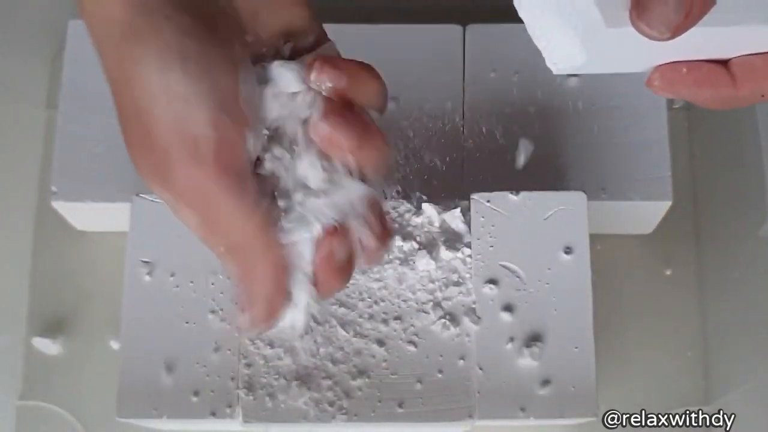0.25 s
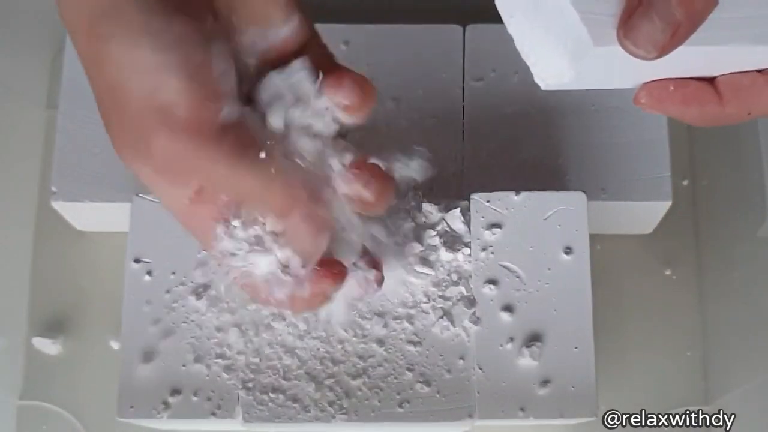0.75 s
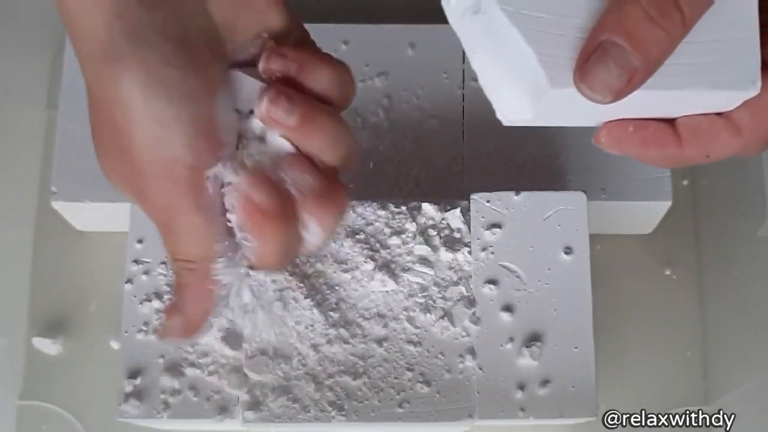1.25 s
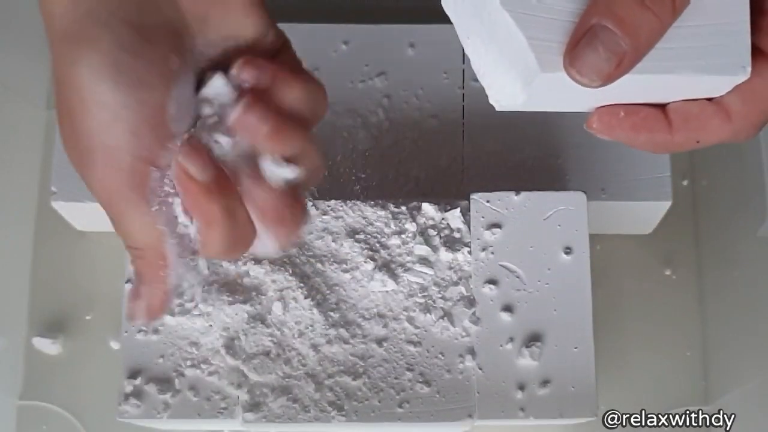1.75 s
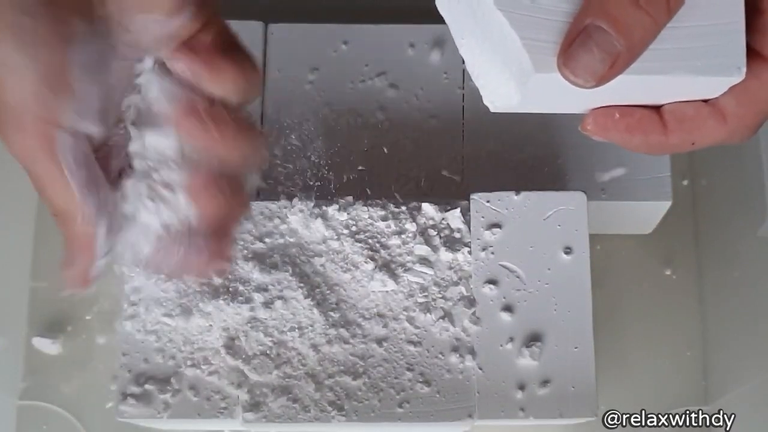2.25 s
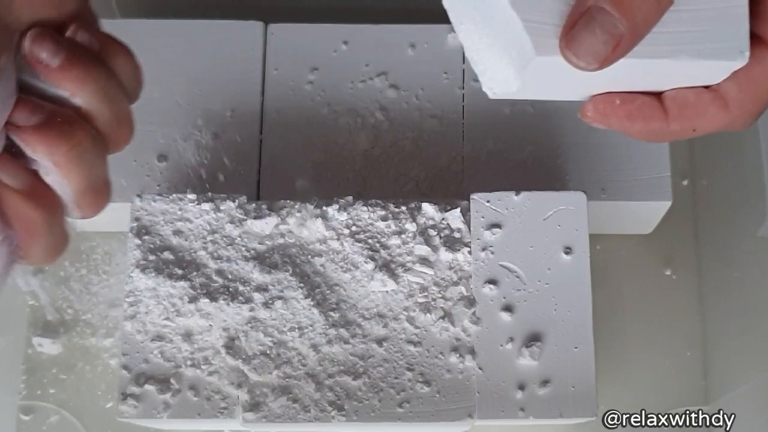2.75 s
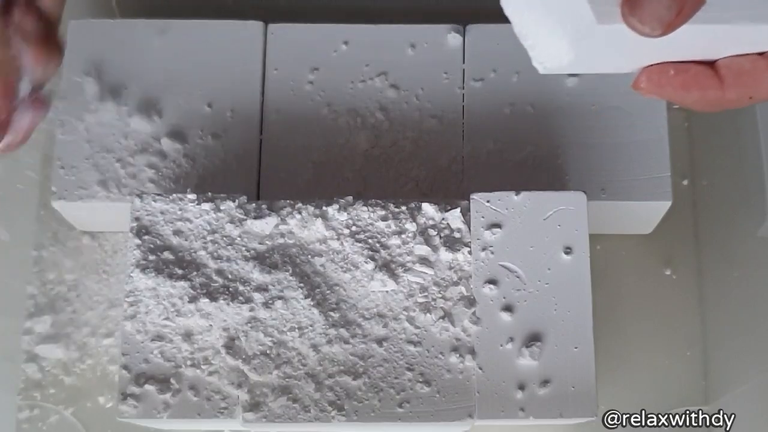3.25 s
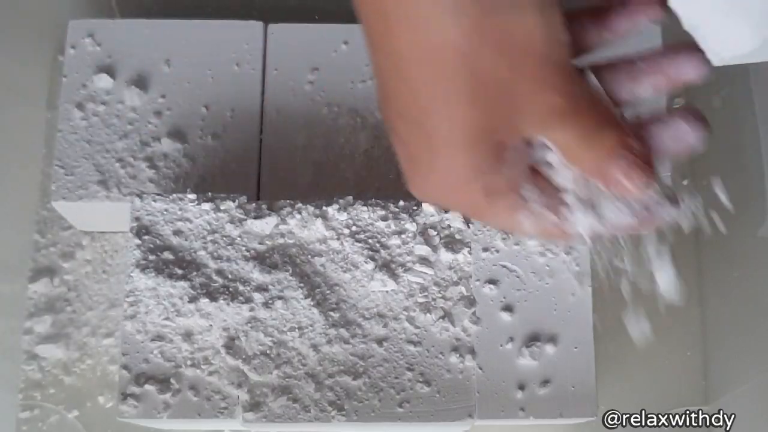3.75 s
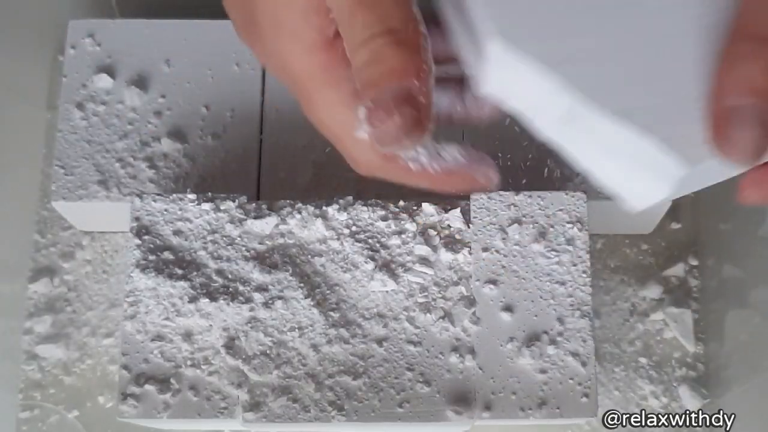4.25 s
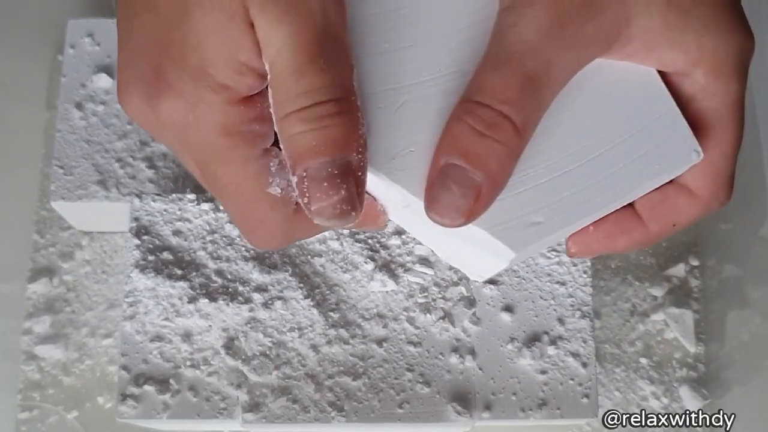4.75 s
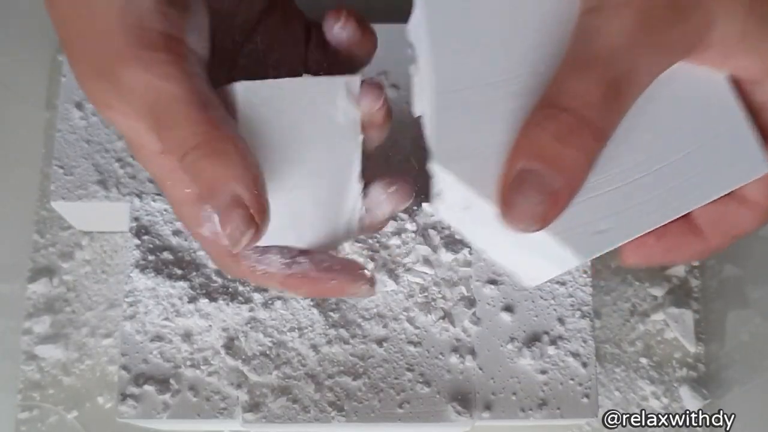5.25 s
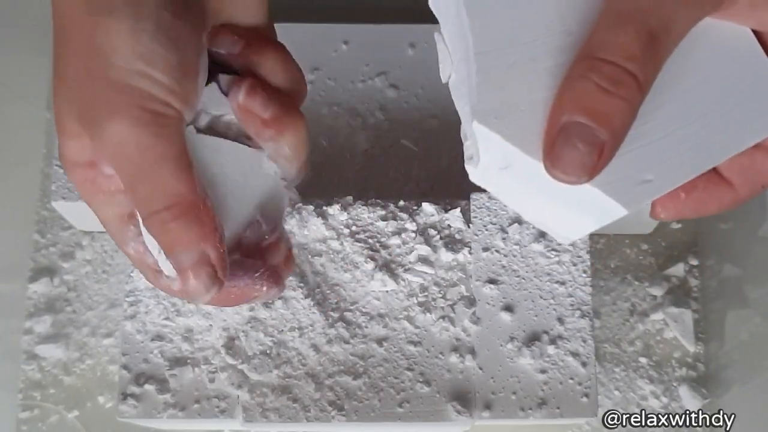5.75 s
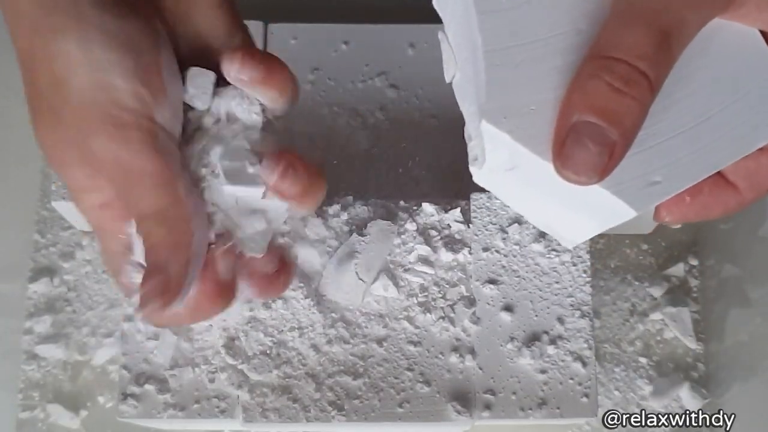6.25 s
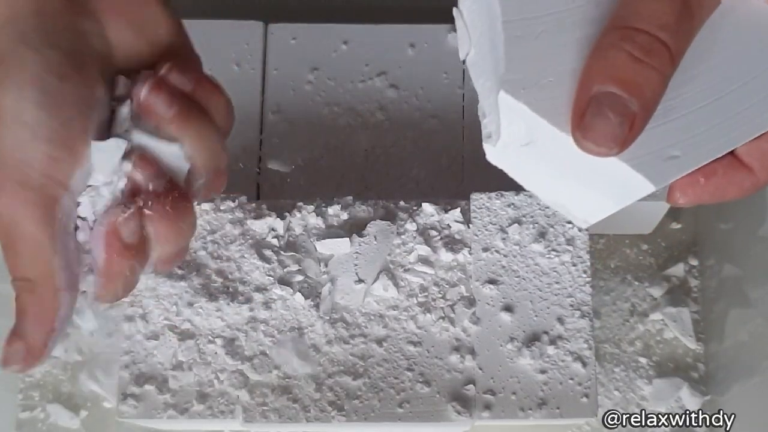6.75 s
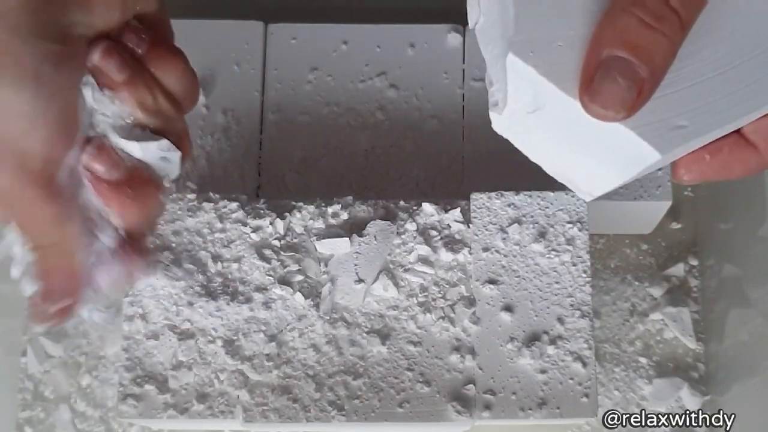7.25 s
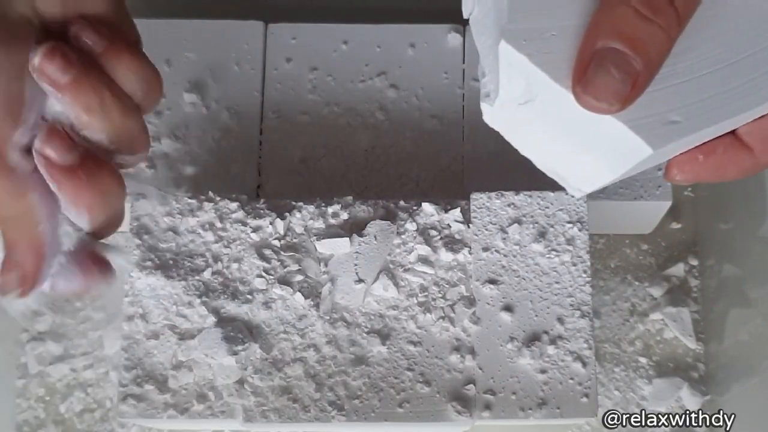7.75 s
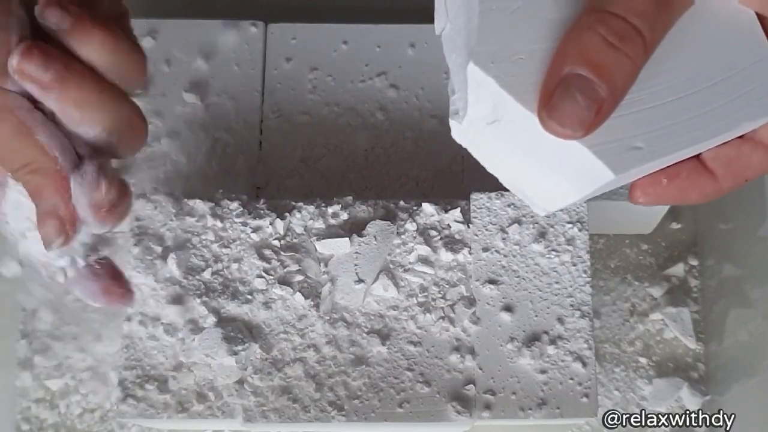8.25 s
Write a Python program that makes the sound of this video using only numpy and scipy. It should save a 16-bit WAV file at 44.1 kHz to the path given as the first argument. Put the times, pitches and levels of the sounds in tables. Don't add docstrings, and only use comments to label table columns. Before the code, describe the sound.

A close microphone in a quiet room with a faint hush and slight hum picks up dry chalk being crushed by hand. From 0 to 2.9 seconds, uneven squeezes give crisp snaps, gritty crackles and swelling powder hiss, with a very sharp crack near 0.15 and a cluster around 2.2 to 2.6. At 3.1 a duller knock lands, then crumbs scatter and patter, thinning by 3.6. Heavy bits tumble in a crunchy cluster from 3.9 to 4.2. A near-silent lull follows until a slab breaks at about 5.0 with a loud, hollow, clinking knock and low thump. Light crackles lead to a loud burst of crushing from 5.7 to 6.2. Dense crunching and grinding continue to about 8.5, with deep knocks near 6.9 and 7.4, brief high clinks, pattering crumbs, hissing powder and a short soft room tail.

```python
import sys
import numpy as np
from scipy import signal
from scipy.fft import rfft, irfft
from scipy.io import wavfile
from scipy.ndimage import uniform_filter1d, map_coordinates

SR = 44100
rng = np.random.default_rng(int(sys.argv[2]) if len(sys.argv) > 2 else 0)


def wav_out(sig):
    wavfile.write(sys.argv[1], SR, np.round(np.clip(np.atleast_2d(sig).T, -1, 1) * 32767).astype(np.int16))


def gain_from_decibels(decibels):
    exponent = np.asarray(decibels, float) / 20
    return 10 ** exponent


N = 374850


def unit(x):
    return x / np.sqrt(np.mean(x ** 2) + 1e-20)


def along(points, hz):
    f, v = np.transpose(points)
    return np.interp(np.log(hz + 1), np.log(f + 1), v)


def coloured(x, spectrum):
    size = 8192
    half = size // 2
    hz = np.fft.rfftfreq(size, 1 / SR)
    cepstrum = irfft(np.log(gain_from_decibels(along(spectrum, hz)) + 1e-6))
    cepstrum[1:half] *= 2
    cepstrum[half + 1:] = 0
    kernel = irfft(np.exp(rfft(cepstrum)))[:half]
    wet = signal.fftconvolve(np.atleast_2d(x), kernel[None], axes=1)
    return wet[..., :x.shape[-1]].reshape(x.shape)


def wobble(rate):
    knots = rng.standard_normal(int(N * rate / SR) + 4)
    return map_coordinates(knots, [np.arange(N) * rate / SR])


def laid(times, rows):
    at = np.round(times * SR).astype(int)[:, None] + np.arange(rows.shape[1])
    return np.bincount(at.ravel(), rows.ravel(), N + SR)[:N]


def levelled(rows, db):
    loud = uniform_filter1d(rows ** 2, 140, axis=1).max(axis=1, keepdims=True)
    return gain_from_decibels(db) * rows / np.sqrt(loud)


def resonance(f, centre, width):
    return 1j * f * width / (centre * centre - f * f + 1j * f * width)


def tearing(count, t, t60, spiky_db):
    draw = rng.standard_normal((count, 2, len(t)))
    uneven = 3.5 * uniform_filter1d(draw[:, 1], 12, axis=1)
    attack = 0.00044 * np.exp(.7 * draw[:, 1, -1:])
    decay = gain_from_decibels(spiky_db * uneven - 60 * t / t60)
    return draw[:, 0] * decay * (1 - np.exp(-t / attack))


def shaped(rows, gain, width, known_hz=()):
    f = np.fft.rfftfreq(rows.shape[1], 1 / SR)
    hz = 4000 * np.exp(0.582 * rng.standard_normal((len(rows), 2, 1)))
    hz[:len(known_hz), :, 0] = np.reshape(known_hz, (-1, 1))
    favour = resonance(f, hz, width * hz).sum(axis=1)
    return irfft(rfft(rows) * (1 + gain * favour), rows.shape[1])


def rings(table, t60, attack):
    s, db, hz = np.transpose(table)[:, :, None]
    t = np.arange(SR // 4) / SR
    envelope = gain_from_decibels(db - 60 * t / t60) * (1 - np.exp(-t / attack))
    return laid(s[:, 0], envelope * np.sin(2 * np.pi * hz * t))


# f/Hz, spectral level/dB per Hz
AIR_SPECTRUM = [(22, -35.5), (45, -4), (70, -11.5), (110, -8), (170, -15), (300, -21.5), (800, -43.5),
                (1050, -32.5), (1300, -48), (1900, -38), (3000, -65.5), (7500, -38), (10500, -61),
                (16000, -71)]


def air():
    hum_hz, hum_db, hush_db = 200.7, -64.5, -57.5
    phase = 2 * np.pi * hum_hz * np.arange(N) / SR + 0.52 * wobble(14)
    hum = gain_from_decibels(hum_db + 3.8 * wobble(6)) * np.sin(phase)
    hush = unit(coloured(rng.standard_normal(N), AIR_SPECTRUM))
    return hum + gain_from_decibels(hush_db + 0.4 * wobble(3.8)) * hush


# t/s, rise/s, fall/s, hiss level/dB
GUSHES = [(.12, 1, 0.15, -42), (.5, 0.45, 0.43, -48.5), (.93, 0.17, 0.71, -47.5), (1.13, 0.29, 0.05, -54),
          (1.3, 0.11, 0.52, -60.5), (1.62, 0.27, 0.087, -56), (1.83, 0.23, 0.05, -51),
          (2.131, 0.22, 0.58, -46), (2.56, 0.1, 0.24, -41), (2.84, 0.18, 0.11, -50.5),
          (2.98, 0.082, 0.071, -53), (3.16, .15, 0.79, -50.5), (3.45, 0.37, 0.086, -58.5),
          (3.793, 0.12, 0.068, -48), (4.11, 0.3, 0.1, -50), (4.24, .08, 0.26, -64),
          (4.45, 0.086, 0.13, -50.5), (4.63, 0.062, 0.084, -53), (4.945, 0.018, .15, -65),
          (5.01, 0.021, 0.5, -56.5), (5.28, 0.038, 0.051, -45.5), (5.4, 0.056, 0.043, -51),
          (5.484, 0.026, 0.023, -39), (5.63, 0.17, 0.68, -50), (5.93, 0.046, 0.49, -46.5),
          (6.31, 0.16, 0.1, -43.5), (6.52, 0.2, 0.98, -44), (7.11, 0.077, 0.18, -40),
          (7.33, 0.14, 0.087, -42), (7.76, .4, 0.56, -44), (8.23, 0.15, 0.83, -55), (8.5, 0.43, .3, -53)]
# t/s, level of crumb patter over powder hiss/dB
COARSENESS = [(0, -4.5), (.68, -2), (1.1, -3.5), (1.6, 1.5), (1.85, -0.5), (2.6, -3), (3.4, -2.5),
              (3.8, -13), (4.11, 13), (4.24, 16.5), (4.36, 3), (4.45, -14), (4.65, -29.5), (5.0, 7),
              (5.3, -15), (5.75, -5), (6.0, -2), (6.2, -2), (8.2, -4.5), (8.5, 10.5)]


def flow():
    still_db, gush_drop_db = -79.5, 20
    t = np.arange(0, N, 100) / SR
    s, rise, fall, peak_db = np.transpose(GUSHES)[:, :, None]
    before = (s - t) / np.maximum(rise, .02)
    after = (t - s) / np.maximum(fall, .02)
    away = np.where(t < s, before, after)
    power = gain_from_decibels(2 * (peak_db - gush_drop_db * away ** 2)).sum(axis=0)
    hiss_db = 10 * np.log10(gain_from_decibels(2 * still_db) + power)
    patter_db = hiss_db + np.interp(t, *np.transpose(COARSENESS))
    return [np.interp(np.arange(N) / SR, t, db) for db in (hiss_db, patter_db)]


def grit(per_s, size_db, t60, hz, spread):
    count, largest_db = 2600, 6.5
    draw = rng.random((count, 2))
    pitch = np.clip(hz * np.exp(spread * rng.standard_normal((count, 1))), 200, 14000)
    times = np.cumsum(np.log(draw[:, 0]) ** 2) / (2 * per_s)
    keep = times < N / SR
    t = np.arange(SR // 50) / SR
    size = gain_from_decibels(np.minimum(-size_db * np.log(draw[:, 1:]), largest_db))
    decay = gain_from_decibels(-60 * t * np.sqrt(pitch) / 1.1)
    ring = np.sin(2 * np.pi * pitch * t) * decay * (1 - np.exp(-t / 0.00029))
    rattle = tearing(count, t, t60, spiky_db=0.0)
    bits = size * (rattle + 0.28 * ring)
    return unit(laid(times[keep], bits[keep]))


# f/Hz, spectral level/dB per Hz
POWDER = [(1180, -74), (2000, -39.5), (4270, -5.5), (4470, -10.5), (5280, -7.5), (9710, -9.5),
          (13000, -23.5), (16500, -35.5)]
# f/Hz, level/dB
CRUMBS = [(150, -23), (400, -1), (700, -4), (1050, 1.5), (1600, -1), (2500, -1), (5000, -7), (10000, -34.5)]


def pour():
    hiss_db, patter_db = flow()
    patter_db = np.minimum(patter_db, -43)
    squeeze = np.clip((patter_db + 64) / 8, .03, 1)
    bits = squeeze * grit(per_s=100, size_db=-2.0, t60=0.012, hz=2920, spread=.8)
    unsteady = 3 * np.array([wobble(110), wobble(60)]) - 5
    stream = gain_from_decibels(squeeze * unsteady) * rng.standard_normal((2, N))
    fine = squeeze * grit(per_s=210, size_db=0.5, t60=0.006, hz=6580, spread=0.5)
    coarse = squeeze * grit(per_s=90, size_db=3.0, t60=0.04, hz=1294, spread=0.27)
    hiss = coloured(stream[0] + 0.69 * bits + 0.88 * fine, POWDER)
    patter = coloured(stream[1] + 0.28 * bits + 1.09 * coarse, CRUMBS)
    return gain_from_decibels(hiss_db + 1.0) * unit(hiss) + gain_from_decibels(patter_db + 3.0) * unit(patter)


# f/Hz, level/dB
CRISP = [(2500, -38.5), (5000, -2.5), (7500, 0.5), (10000, -7), (13000, -20), (16000, -28.5)]
# t/s, crunch level/dB, crisp level/dB
CHIPS = [(0.028, -40, -41.5), (0.034, -39, -35.5), (0.077, -31.5, -33), (0.211, -55, -34),
         (0.274, -56.0, -43.0), (0.454, -60, -36), (0.475, -55, -37), (0.494, -41, -46),
         (0.504, -38, -42), (0.558, -42, -42.0), (0.597, -31.5, -45), (0.628, -35, -38),
         (0.644, -35, -35), (0.78, -39.5, -36.5), (0.8, -43.5, -45), (0.902, -52, -48),
         (0.984, -45, -48.0), (1.277, -46, -33.5), (1.299, -40, -41), (1.333, -52, -50.5),
         (1.461, -33, -48), (1.492, -39, -38), (1.522, -46, -38.5), (1.618, -42, -33.5),
         (1.625, -35, -41), (1.669, -42, -31), (1.944, -46, -50), (2.197, -43, -36),
         (2.205, -26.5, -37), (2.25, -46, -38), (2.276, -45, -39), (2.288, -38, -49),
         (2.294, -37, -34), (2.324, -55, -39), (2.387, -21.5, -38), (2.396, -39, -36),
         (2.406, -44.5, -35), (2.53, -30.5, -34), (2.656, -51, -38), (2.722, -46.5, -49),
         (2.748, -32, -37), (2.77, -42, -34.5), (2.783, -39, -50.0),
         (2.825, -48, -43), (2.838, -39.5, -41), (2.983, -40.5, -35), (3.056, -40, -38),
                (3.14, -41, -32), (3.17, -41, -53.0), (3.228, -39, -33), (3.234, -40, -38),
                (3.275, -34, -48.0), (3.284, -38, -35), (3.361, -56, -30), (3.365, -53, -34),
                (3.393, -38, -35), (3.453, -40, -38.5), (3.497, -36, -49), (3.627, -51, -43),
                (3.709, -54, -40), (3.915, -48, -48.0), (3.923, -52, -37), (3.933, -44.0, -46.0),
                (4.048, -22, -34.0), (4.093, -20.5, -34.0), (4.108, -21, -21.5), (4.181, -34, -38),
                (4.272, -49, -42.5), (4.78, -69, -72), (4.89, -74, -63), (5.176, -62.5, -46.5),
                (5.182, -53, -45), (5.267, -60, -41), (5.685, -50, -54), (5.761, -32, -33),
                (5.774, -31, -47), (5.791, -32, -36), (5.85, -46, -36), (5.934, -37, -21.5),
                (5.958, -24, -24), (6.007, -34, -26), (6.092, -25, -27), (6.198, -32, -34),
                (6.203, -32, -46), (6.252, -37, -52), (6.282, -48, -44),
         (6.289, -37.5, -43), (6.316, -41, -44), (6.321, -44, -32), (6.375, -61, -32),
              (6.402, -47, -35), (6.478, -51, -32), (6.519, -36, -28), (6.531, -35, -36), (6.577, -52, -34),
              (6.608, -37, -28.5), (6.645, -44, -35.0), (6.704, -35, -28.5), (6.822, -35, -23),
              (6.871, -31, -43), (7.06, -34, -35), (7.215, -53, -39), (7.283, -39, -32),
              (7.293, -39, -39.0), (7.312, -32.5, -28), (7.324, -48, -28), (7.396, -41, -45),
              (7.507, -32, -38), (7.53, -52, -37), (7.6, -46, -44.0), (7.607, -36, -44), (7.665, -35, -47),
              (7.676, -31, -50), (7.719, -51, -35.0), (7.742, -28, -41), (7.785, -30, -32),
              (7.877, -30.5, -38.0), (7.936, -35, -35), (7.955, -35, -43), (7.996, -40, -47),
              (8.182, -46, -39), (8.191, -61, -47), (8.2, -61, -35), (8.258, -49, -38), (8.273, -43, -32.5),
              (8.282, -37, -38), (8.318, -39, -32), (8.424, -31, -37), (8.44, -32.5, -42)]


def chips():
    s, crunch_db, crisp_db = np.transpose(CHIPS)[:, :, None]
    t = np.arange(SR // 30) / SR
    onset = 1 + 3.4 * gain_from_decibels(-60 * t / 0.0038)
    crack = shaped(tearing(len(s), t, 0.024, spiky_db=3.5) * onset, gain=1.9, width=.12)
    thick = levelled(coloured(crack, CRUMBS), crunch_db + 0.5)
    thin = levelled(coloured(crack, CRISP), crisp_db - .3)
    return laid(s[:, 0] - .0005, thick + thin)


# t/s, knock level/dB, crunch level/dB, crisp level/dB, favoured f/Hz
SNAPS = [(0.1515, -34, -15, -5, 7300), (0.61, -27, -21, -21, 1900), (0.668, -35, -21, -19.5, 2240),
         (1.149, -22, -27.5, -23, 4370), (1.391, -31.5, -19, -14.5, 4100),
         (2.1712, -34, -16.5, -21.5, 2800), (2.34, -31, -15.5, -18, 3470), (2.4352, -23, -16, -16, 4360),
         (2.6434, -39, -21, -15, 4050), (3.077, -18, -19, -35, 1980), (3.9538, -24.5, -16, -24, 2710),
         (4.034, -23.5, -24, -31, 1950), (4.0802, -23.5, -16.5, -25, 1510), (4.1134, -16, -10.5, -33, 1960),
         (4.219, -18.5, -16.5, -41, 2260), (4.984, -10.5, -18.5, -16, 1880), (5.7248, -10, -7, -7.5, 2560),
         (5.8005, -33, -16, -24, 3500), (5.913, -17.5, -5.5, -10, 3610), (5.9957, -23, -12.5, -15, 2880),
         (6.059, -31.5, -19.5, -25.5, 3420), (6.1246, -47, -16.5, -24.5, 2030),
         (6.176, -18.5, -31, -57, 2000), (6.8539, -10, -24.5, -33, 3400), (6.9142, -14.5, -17, -29, 2440),
         (7.002, -15, -27, -31, 2200), (7.3444, -13, -23, -31, 2760), (7.436, -18, -15, -21.5, 2420),
         (7.4786, -29, -17, -15, 7050), (7.7695, -19, -24.5, -26, 1470)]
# t/s, peak level/dB, heft (share of knock in the peak)/dB
SMALL_BREAKS = [(0.097, -14.5, -33.5), (0.161, -15.5, -40), (0.173, -14.5, -34), (0.202, -16.5, -22),
                (0.391, -19, -49), (0.425, -21.5, -43), (0.573, -30, -3), (0.59, -26.5, -3.5),
                (0.681, -12, -16), (0.692, -21, -21), (1.039, -30, -4), (1.109, -11, -48.5), (1.314, -21, -25),
                (1.446, -21, -14.5), (1.593, -19, -33.5), (1.606, -17, -11.5), (1.675, -12, -33),
                (1.686, -16, -17.5), (1.704, -19, -49), (1.965, -18.5, -38), (2.121, -15, -27),
                (2.132, -12.5, -33), (2.215, -12, -20), (2.383, -27, -31), (2.516, -17, -27),
                (2.564, -14.5, -30), (2.586, -18.5, -37), (2.672, -21, -18.5), (2.868, -23.5, -19.5),
                (3.193, -14, -24), (3.254, -12, -18.5), (3.302, -16.5, -18.5), (3.322, -13.5, -47),
              (3.345, -16, -26), (3.413, -15, -16.5), (3.473, -18.5, -11.5), (3.889, -18.5, -18.5),
              (3.987, -18.5, -33), (4.002, -15, -20.5), (4.049, -18.5, -6), (4.101, -7.5, -11),
              (4.127, -13.5, -30), (4.155, -11, -17), (4.201, -20.5, -24), (4.932, -20.5, -25),
              (5.017, -17.5, -27), (5.052, -18.5, -19.5), (5.46, -22, -23), (5.524, -20, -19),
              (5.562, -23, -27), (5.597, -24, -20.5), (5.672, -17, -28.5),
                (5.752, -21, -18), (5.779, -15.5, -20), (5.819, -12.5, -36), (5.931, -19, -42),
            (5.954, -12, -25), (5.984, -5.5, -33), (6.064, -14.5, -19), (6.079, -6.5, -18),
            (6.1, -10.5, -28), (6.116, -12, -25), (6.156, -15, -14), (6.399, -18, -31), (6.416, -19, -23),
            (6.446, -15.5, -9.5), (6.451, -10.5, -17), (6.497, -16, -24), (6.559, -14, -32),
            (6.584, -16.5, -20), (6.612, -16, -19), (6.634, -18, -21.5), (6.655, -14.5, -53),
            (6.674, -16, -20), (6.693, -14, -30), (6.789, -10.5, -19), (6.821, -39, 1), (6.958, -17, -23),
                (7.082, -9, -20.5), (7.108, -14, -22), (7.132, -18, -18.5), (7.147, -15, -20),
            (7.177, -15.5, -27), (7.259, -18, -22), (7.272, -21, -24), (7.353, -18.5, -2),
            (7.411, -17, -14.5), (7.457, -13.5, -11.5), (7.488, -16, -17), (7.514, -20, -20.5),
            (7.58, -23, -14.5), (7.616, -13, -17), (7.659, -20.5, -19), (7.685, -15, -17.5),
            (7.729, -15.5, -18), (7.862, -17, -19.5), (7.912, -13, -13.5), (7.925, -19.5, -13),
            (8.033, -21, -20), (8.106, -17.5, -10.5), (8.304, -18.5, -11), (8.325, -13, -11.5),
            (8.454, -17.5, -16.5), (8.473, -33, -17), (8.49, -17.5, -17.5)]


def pieces():
    s, peak_db, heft_db = np.transpose(SMALL_BREAKS)
    heavier = heft_db + 21
    knock_db = peak_db + heft_db + 1
    crunch_db = peak_db - 10.5 - 0.37 * np.abs(heavier)
    crisp_db = peak_db - 10.5 - np.maximum(heavier, 0)
    small = [s + .001, knock_db, crunch_db, crisp_db]
    return np.hstack([np.transpose(SNAPS)[:4], small])


# f/Hz, width/Hz, level/dB
BLOCK_MODES = [(476, 230, -6), (712, 75, -6), (848, 70, -4), (1090, 240, 7.5), (1400, 570, -3),
               (2040, 1200, -7), (2470, 140, -28.5)]
# t/s, f/Hz
LUMPS = [(3.077, 1056), (4.113, 870), (4.218, 860), (4.984, 1040), (5.725, 987), (5.913, 1000),
         (6.176, 865), (6.446, 710), (6.853, 730), (6.914, 1190), (7.001, 1144), (7.344, 1106),
         (7.436, 845), (7.769, 520)]


def struck(s, push):
    f = np.fft.rfftfreq(push.shape[1], 1 / SR)
    spot_db = rng.normal(0, 1.5, (len(push), len(BLOCK_MODES), 1))
    block = 0
    for k, (centre, width, level) in enumerate(BLOCK_MODES):
        block = block + (-1) ** k * gain_from_decibels(level + spot_db[:, k]) * resonance(f, centre, width)
    lump_hz = 880 * np.exp(0.32 * rng.standard_normal((len(push), 1)))
    when, hz = np.transpose(LUMPS)
    lump_hz[np.abs(s - when).argmin(axis=0), 0] = hz
    lump = resonance(f, lump_hz, .45 * lump_hz)
    edges = resonance(f, 430, 3200)
    return irfft(rfft(push) * (block + gain_from_decibels(6) * lump) * edges ** 2, push.shape[1])


# f/Hz, level/dB
DULL = [(600, -18), (1600, 1), (3000, 1.5), (4800, -3), (8000, -23.5), (14000, -52)]


def snaps():
    s, knock_db, crunch_db, crisp_db = pieces()[:, :, None]
    t = np.arange(SR // 14) / SR
    t60 = 0.02 * gain_from_decibels(0.013 * (np.maximum(knock_db, crunch_db) + 28.5))
    sharp = np.where(crisp_db - knock_db > 8, 0.92, 0.54)
    onset = 1 + 1.5 * sharp * gain_from_decibels(-60 * t / 0.0024)
    crack = tearing(len(s), t, t60, spiky_db=0.5) * onset
    rubble = gain_from_decibels(-13.5) * tearing(len(s), t, 1.45 * t60, spiky_db=7.0)
    first = 9 * sharp * np.roll(t == 0, 6)
    edge = shaped(crack + rubble + first, gain=1.02, width=0.16, known_hz=np.transpose(SNAPS)[-1])
    crisp = levelled(coloured(edge, CRISP), crisp_db)
    crunch = levelled(coloured(edge, DULL), crunch_db)
    blow = np.exp(-t / 0.000093) * (t > 0)
    knock = levelled(struck(s, blow + 0.072 * crack + 0.71 * rubble), knock_db)
    return laid(s[:, 0], crisp + crunch + knock)


# t/s, peak level/dB, f/Hz
BOOMS = [(.15, -38, 98), (1.15, -35, 173.6), (2.11, -38, 80.5), (3.413, -35, 72.2), (4.113, -28.5, 123.2),
         (4.984, -25.5, 182), (4.985, -26.5, 88.4), (5.526, -35, 109), (5.725, -38, 213),
         (5.912, -32.5, 126), (6.176, -31, 96), (6.914, -25.5, 209), (6.94, -28, 95), (7.344, -32, 204),
         (7.793, -33, 112), (8.324, -39.5, 151)]


def booms():
    return rings(BOOMS, t60=0.092, attack=0.0028)


# t/s, crunch level/dB, crisp level/dB
TICKS = [(0.2834, -18.5, -45), (0.3535, -30, -39), (0.5118, -18, -38.5), (0.9453, -13, -37.5),
         (1.385, -14, -43), (1.731, -26, -38.5), (1.907, -63, -46), (3.531, -25, -49), (3.556, -29, -38),
         (3.591, -22.5, -43.5), (4.267, -28, -47), (4.364, -35, -52.5), (2.426, -7, -41), (5.146, -24, -40),
         (5.413, -25.5, -40), (5.701, -33, -44), (5.906, -5, -37), (6.845, -5.5, -28.5), (6.91, -4.5, -33),
         (8.2384, -25, -41)]


def ticks():
    s, crunch_db, crisp_db = np.transpose(TICKS)[:, :, None]
    crack = tearing(len(s), np.arange(SR // 20) / SR, 0.018, spiky_db=7.5)
    crisp = levelled(coloured(crack, CRISP), crisp_db + 3.5)
    crunch = levelled(coloured(crack, DULL), crunch_db - 19.0)
    return laid(s[:, 0], crisp + crunch)


# t/s, level/dB, f/Hz
CLINKS = [
    (.391, -31, 4400),
    (1.1, -33, 2400),
    (1.151, -28, 1050),
    (2.276, -33, 4250),
    (4.9845, -7.5, 1020),
    (5.6, -28, 4180),
    (5.625, -28, 4240),
    (5.915, -17, 3650),
    (6.493, -28, 5100),
    (6.558, -22, 5000),
]


def clinks():
    return rings(CLINKS, t60=0.028, attack=0.0005)


# t/s, level/dB, f/Hz
SHARDS = [(.428, -41, 2300), (.695, -33, 2170), (1.035, -39, 3480), (2.381, -35, 2300), (2.408, -36, 2200),
          (3.63, -47, 2200), (3.865, -50, 2160), (4.42, -46, 4630), (6.033, -30, 6800), (6.1, -25, 5060),
          (7.862, -29, 4330), (8.2, -32, 4200), (8.24, -39, 4250)]


def shards():
    hz = np.array(SHARDS)[:, 2:]
    return rings(SHARDS, t60=300 / hz, attack=0.0005)


# f/Hz, t60/s
ROOM_T60 = [(200, 0.55), (1500, 0.42), (5000, 0.22), (12000, 0.16)]


def room(x):
    out, step = np.zeros(N + 2 * SR), SR // 4
    for a in range(0, N, step):
        hz, t, z = signal.stft(rng.standard_normal(SR // 2), SR, nperseg=256)
        decay = gain_from_decibels(-60 * t / along(ROOM_T60, hz)[:, None])
        tail = signal.istft(z * decay, SR, nperseg=256)[1]
        wet = signal.fftconvolve(x[a:a + step], tail / np.linalg.norm(tail))
        out[a + 200:][:len(wet)] += wet
    return out[:N]


def scene():
    chalk = snaps() + ticks() + clinks() + shards()
    reverberant = gain_from_decibels(-20.5) * room(chalk)
    return (air() + pour() + chips() + chalk + booms() + reverberant)[None]


def top_cut(x):
    return signal.sosfilt(signal.butter(12, 16990, fs=SR, output="sos"), x)


# f/Hz, level/dB
MICROPHONE = [(15, -27), (35, 3), (15700, -3.5), (16100, -16), (16800, -31), (17000, -68.5)]


def record(dry):
    clipped = dry / (1 + np.abs(dry / .78) ** 6) ** (1 / 6)
    response = gain_from_decibels(along(MICROPHONE, np.fft.rfftfreq(N, 1 / SR)))
    mix = irfft(rfft(clipped) * response, N)
    return top_cut(mix)


dry = scene()
out = record(dry)
wav_out(out)
```